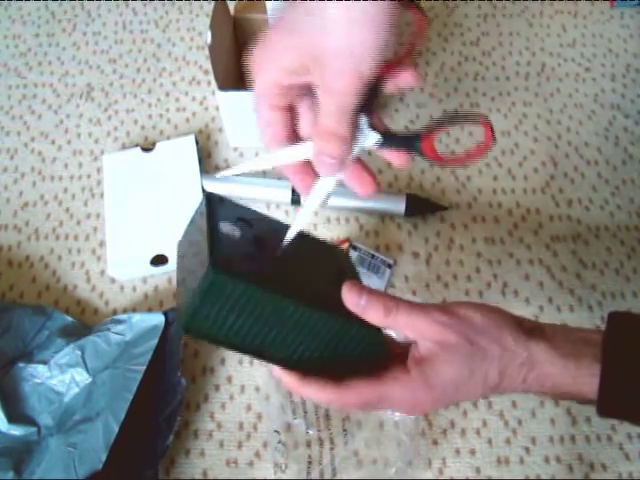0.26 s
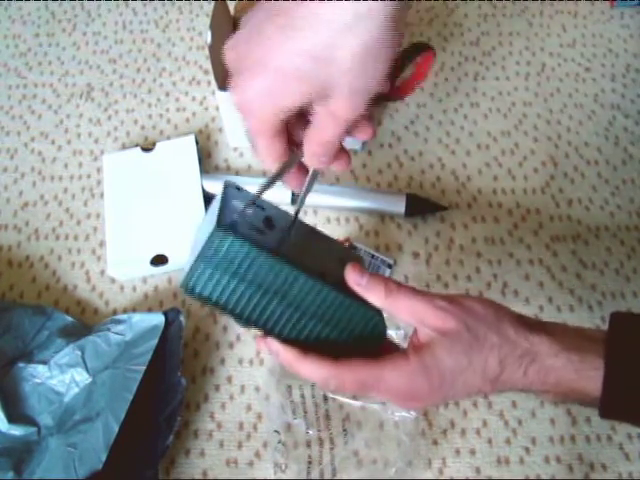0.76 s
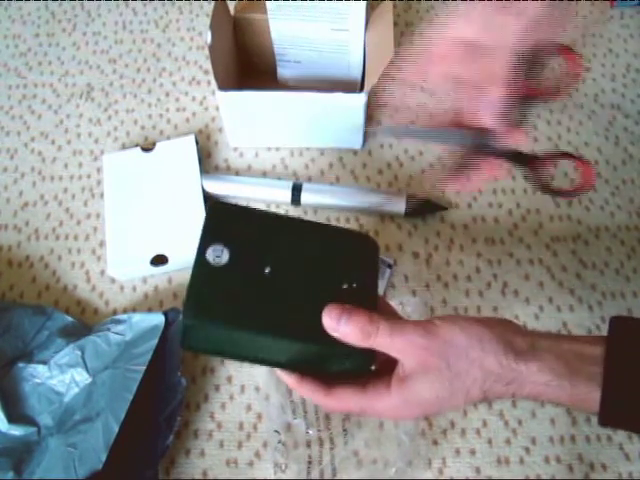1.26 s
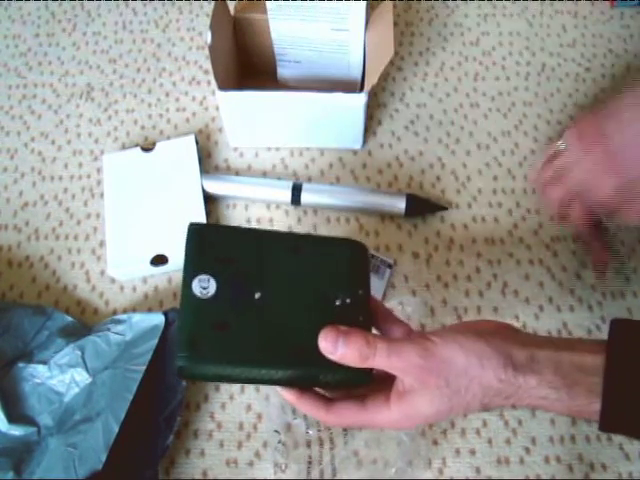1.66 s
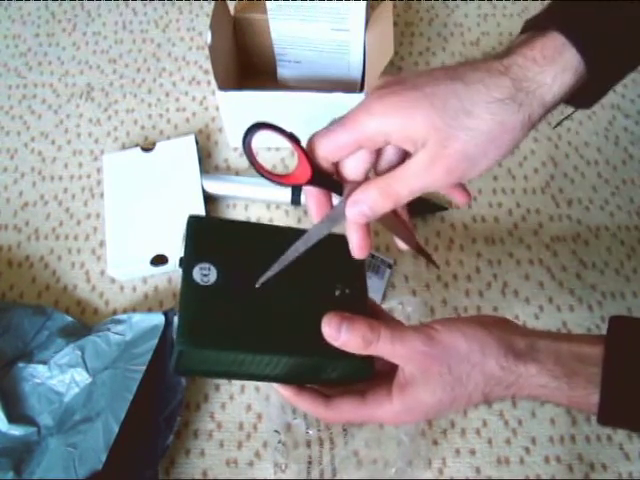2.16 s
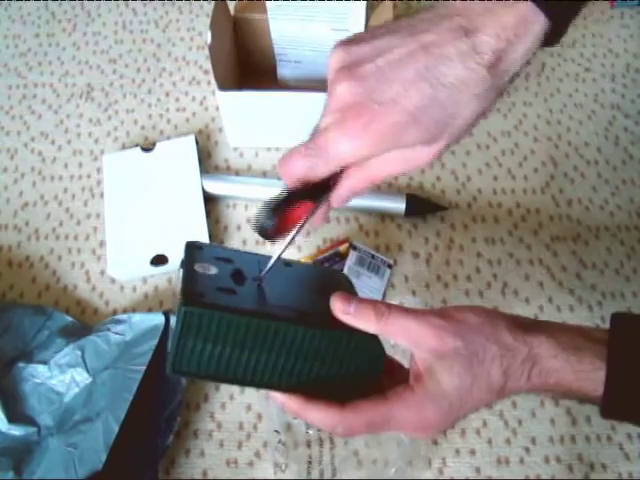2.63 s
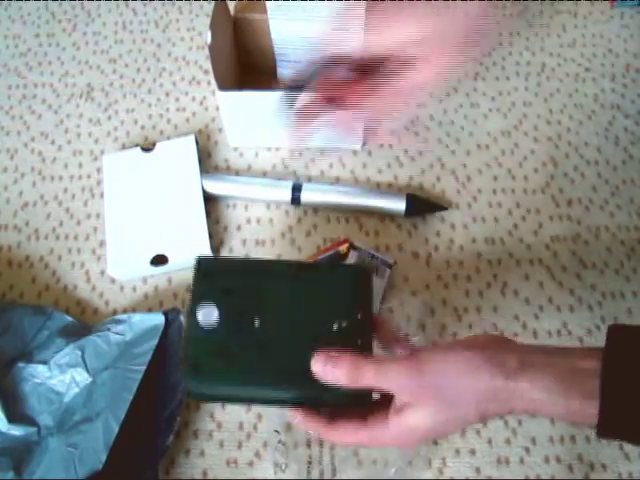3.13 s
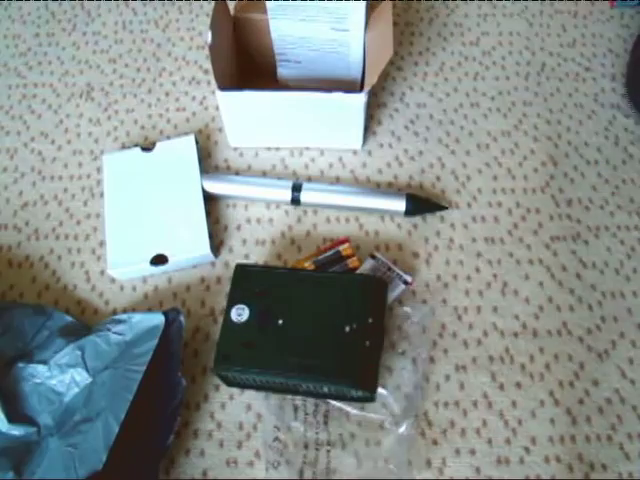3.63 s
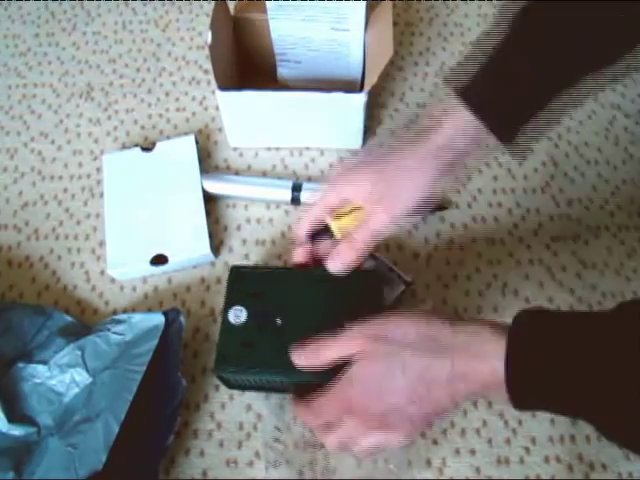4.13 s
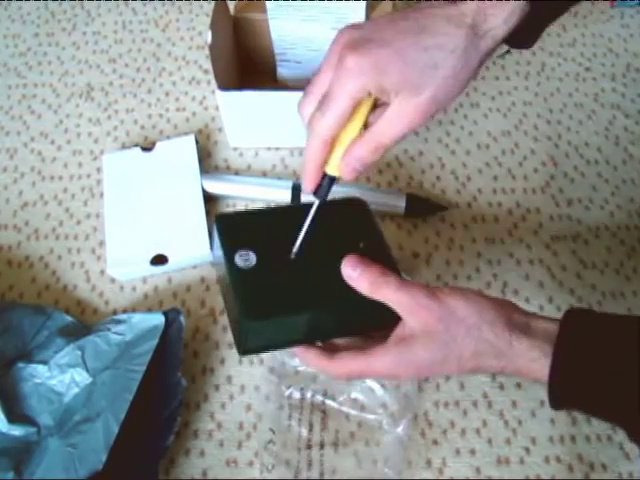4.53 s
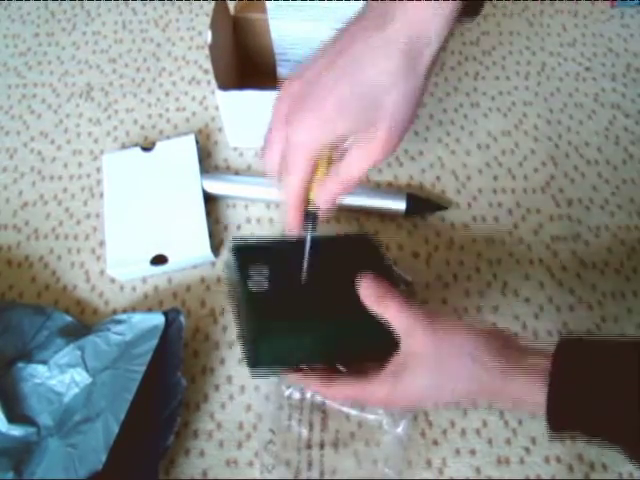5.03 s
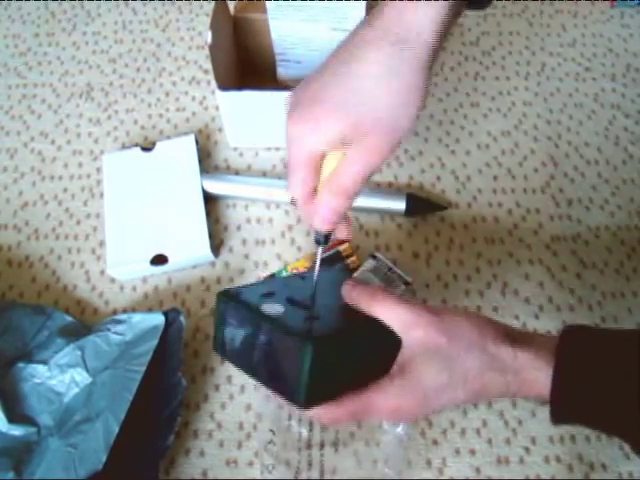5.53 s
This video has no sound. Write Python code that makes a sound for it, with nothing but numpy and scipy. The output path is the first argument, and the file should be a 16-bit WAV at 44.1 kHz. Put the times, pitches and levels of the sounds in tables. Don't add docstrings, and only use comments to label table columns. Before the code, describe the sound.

Scissor tips and then a small screwdriver knock sharply on a hollow plastic case, with soft finger bumps, bag crackle and faint fan whine.

```python
import sys
import numpy as np
from scipy import signal
from scipy.fft import rfft, irfft, next_fast_len
from scipy.io import wavfile
from scipy.ndimage import uniform_filter1d, map_coordinates

SR = 44100
rng = np.random.default_rng(int(sys.argv[2]) if len(sys.argv) > 2 else 0)


def ratio_of_db(decibels):
    return 10 ** (np.asarray(decibels, float) / 20)


def wav_record(signal):
    frames = np.transpose(np.atleast_2d(signal))
    bounded = np.clip(frames, -1, 1)
    quanta = np.round(bounded * 32767).astype(np.int16)
    wavfile.write(sys.argv[1], SR, quanta)


N = 255338
T = np.arange(SR // 4) / SR
ONSET_S = 0.0008


def unit(x):
    return x / np.sqrt(np.mean(x ** 2) + 1e-20)


def peak(x):
    return x / np.abs(x).max()


def along(points, hz):
    f, v = np.transpose(points)
    return np.interp(np.log(hz + 1), np.log(f + 1), v)


def curve(points):
    s, v = np.transpose(points)
    return np.interp(np.arange(N) / SR, s, v)


def wobble(rate_hz):
    knots = rng.standard_normal(int(N * rate_hz / SR) + 4)
    return map_coordinates(knots, [np.arange(N) * rate_hz / SR])


def filtered(x, response):
    m = next_fast_len(len(x) + 4096)
    return irfft(rfft(x, m) * response(np.fft.rfftfreq(m, 1 / SR)), m)[:len(x)]


def modes(peaks):
    def response(f):
        total = 0
        for k, (centre_hz, width_hz, db) in enumerate(peaks):
            damping = 1j * f * width_hz
            total = total + (-1) ** k * ratio_of_db(db) * damping / (centre_hz * centre_hz - f * f + damping)
        return (1j * f / (150 + 1j * f)) ** 2 * total
    return response


def add(track, s, sound, db):
    start = max(round(s * SR), 0)
    track[start:start + len(sound)] += ratio_of_db(db) * peak(sound)


def knocks():
    # (time [s], peak [dB], chatter [ms], edge crack [dB], room [dB])
    face = [(0.374, -14.5, 6.2, -5, -13), (0.377, -22, 1.3, -8, -25), (1.851, -21, 5.9, -3.5, -29),
            (1.869, -27.5, 0.93, -16, -18), (1.884, -26, 4.7, 3.5, -12), (3.2, -25, 3.9, 6, -15),
            (3.207, -22.5, 6.4, -10, -17.5), (3.215, -27.5, 2.1, 0, -4.5)]
    screw = [(0.866, -8.5, 2.85, -2, -8.5), (0.869, -28, 12, -5, -2), (2.607, -11, 5.2, -6.5, -12.5),
             (2.611, -26, 5.3, -10, -9), (4.907, -21.5, 1.5, -7, -38), (4.91, -9.5, 3.1, -6.5, -22.5)]
    rim = [(0.259, -30, 5, -8, -25), (0.266, -15, 1.8, -8, -11), (0.271, -21, 11, -0.5, -11)]
    lid = [(2.246, -24, 6.5, -15, -21), (2.253, -29, 2, -23, -11)]
    corner = [(0.059, -25, 2.6, -18, -31), (0.567, -36, 1.8, -24, -32), (0.575, -18.5, 2, -8.5, -16),
              (4.528, -19.5, 1.2, -1, -23), (4.533, -17, 1.4, -19, -28), (4.693, -33, 4.3, -2, -25)]
    # (frequency [Hz], width [Hz])
    shell_modes = [(400, 336), (545, 155), (720, 134), (900, 128), (1200, 340), (1550, 160), (1780, 290),
                   (2050, 147), (2350, 96), (3170, 153), (4150, 330), (5000, 350)]
    # (level [dB], ...)
    wakes_db = [
        [-29, -21, -22, -2, -13, -1, -14.5, -31, -6, -6.5, -19.5, -16],
        [-21.5, -26, -12.5, -7, -7, 1.5, -1.5, 0.5, -3, -2, -7, -9.5],
        [-16, -7, -11.5, -7.5, -12, 0, -6, -14, -7, -8.5, -17.5, -14.5],
        [-9, -2, -2.5, -1, -4.5, -4, -5, -7, -23, -9, -25, -35],
        [-37, -12.5, -30, -8, -12, -1, -2.5, -5, -8.5, -4, -12, -21],
    ]
    # (skid before blow [dB], jolt of whole case [dB])
    places = [
        (4.5, -64),
        (-2, -28.5),
        (4.5, -55),
        (2, -60),
        (-0.5, -60),
    ]
    shell_top_hz = 6050
    skid_s, jolt_s, front_s = 0.0017, 0.0009, 0.0014
    out, lead = np.zeros(N + SR), SR // 100
    t = T - lead / SR
    after = t >= 0
    for rows, wakes, (skid_db, jolt_db) in zip([face, screw, rim, lid, corner], wakes_db, places):
        ring = modes([(*mode, db) for mode, db in zip(shell_modes, wakes)])
        shell = lambda f: ring(f) / (1 + 1j * f / shell_top_hz) ** 4
        skid = ratio_of_db(skid_db) * np.exp(np.minimum(t, 0) / skid_s) * (t < 0)
        jolt = ratio_of_db(jolt_db) * np.exp(-(t / jolt_s - 1) ** 2)
        for s, db, ms, edge_db, room_db in rows:
            bounce = after * np.exp(-(t / max(ms, 0.3) * 700) ** 2)
            chatter = rng.standard_normal(len(T)) * (skid + bounce)
            chatter[lead] = 11
            crack = rng.standard_normal(len(T)) * (0.1 * skid + after * ratio_of_db(-60 * t / 0.02))
            crack = filtered(crack, lambda f: 1 / (1 + (4600 / (f + 1)) ** 4))
            hit = peak(filtered(chatter, shell)) + ratio_of_db(edge_db) * peak(crack)
            blow = hit * np.exp(-abs(t) / front_s)
            blow = blow * np.linalg.norm(hit) / np.linalg.norm(blow)
            echo = signal.fftconvolve(blow, tail())[:len(T)]
            add(out, s + ONSET_S - lead / SR, hit + jolt + ratio_of_db(room_db) * echo, db + 3.0)
    return out[:N]


def tail():
    # (frequency [Hz], t60 [s])
    room_t60 = [(300, 0.2), (1000, 0.19), (1500, 0.19), (3000, 0.2), (6000, 0.13), (10000, 0.18)]
    # (frequency [Hz], level [dB])
    room_colour = [(200, -2), (600, 1), (1400, 6.5), (2300, -8), (3200, -10), (6000, -11), (10000, -20.5)]
    hz, t, z = signal.stft(rng.standard_normal(len(T)), SR, nperseg=128)
    wall = 1 + 0.41 * np.exp(-((t - 0.038) / 0.011) ** 2)
    decay_db = along(room_colour, hz)[:, None] - 60 * t / along(room_t60, hz)[:, None]
    x = signal.istft(z * wall * ratio_of_db(decay_db), SR, nperseg=128)[1]
    x = x[:len(T)] * (1 - np.exp(-(T / 0.001) ** 2))
    return x / np.linalg.norm(x)


def taps():
    # (time [s], peak [dB])
    drumming = [(0.754, -27), (0.761, -40), (1.05, -30.5), (1.939, -35), (1.993, -24.5), (2.163, -33.5),
                (2.989, -28), (3.181, -37), (3.631, -36.5), (4.054, -33), (4.196, -31.5), (4.368, -26),
                (4.465, -36.5), (5.632, -36), (5.731, -27.5)]
    # (time [s], peak [dB], panel [Hz])
    rubs = [(0.104, -26.5, 1030), (0.698, -27, 1060), (1.165, -36, 606), (1.199, -29, 736),
            (0.754, -26, 1110), (1.506, -30, 660), (1.74, -31.5, 1240), (2.34, -29.5, 1090),
            (2.51, -31, 575), (2.809, -30.5, 1050), (3.106, -29, 1060), (4.097, -26, 1347),
            (4.124, -31, 685), (4.44, -31, 1250), (4.847, -36, 1240), (5.03, -28.5, 1340),
            (5.279, -43, 540)]
    # (time [s], peak [dB], panel [Hz])
    thuds = [(0.002, -35.5, 477), (0.015, -33, 494), (0.373, -26.5, 550), (0.752, -33.5, 415),
             (0.867, -30.5, 562), (1.405, -41, 610), (1.419, -34.5, 236), (1.43, -43, 456),
             (2.246, -31, 790), (2.247, -37, 453), (1.493, -40, 283), (2.611, -29, 553),
             (4.314, -42.5, 186)]
    # (frequency [Hz], level [dB])
    scuff_colour = [(300, -11.5), (900, -7), (1500, -6.5), (2300, -11.5), (4000, -17.5), (9000, -34)]
    contacts = [(*row, 899, 3.44, 1.5) for row in drumming]
    contacts += [(*row, 5.5, 11.5) for row in rubs]
    contacts += [(*row, 4.7, -11) for row in thuds]
    out = np.zeros(N + SR)
    for s, db, hz, ms, scuff_db in contacts:
        u = T[:4000] / (max(ms, 0.5) / 1000)
        press = rng.standard_normal((2, 4000)) * u * np.exp(-u)
        hum = filtered(filtered(press[0], modes([(hz, 55, 0)])), modes([(hz, 250, 0)]))
        scuff = filtered(press[1], lambda f: ratio_of_db(along(scuff_colour, f)))
        add(out, s - 0.003, peak(hum) + ratio_of_db(scuff_db) * peak(scuff), db - 6.5)
    return out[:N]


def ticks():
    # (time [s], peak [dB], centre [Hz], t60 [s])
    pivot = [(1.3173, -37.5, 3260, .012), (1.4142, -31.5, 9000, 0.022), (1.5618, -25.5, 9400, 0.023),
             (1.6155, -12, 10200, 0.014), (1.6158, -24.5, 1930, 0.011), (2.512, -39, 3770, 0.016),
             (2.9913, -27, 6350, 0.029), (3.501, -34.5, 5860, 0.014), (3.5668, -39.5, 6000, .008),
             (4.524, -35, 3170, .009), (5.0794, -42, 3150, .012), (5.1265, -37, 2870, .024),
             (5.4705, -31.5, 7200, 0.008)]
    # (time [s], peak [dB], centre [Hz])
    folds = [(3.162, -26, 9100), (3.1714, -40, 3600), (3.1834, -36, 4140), (3.2011, -23.5, 7100),
             (3.2084, -42, 2590), (3.2283, -28, 3850), (3.2408, -27, 2540), (3.2497, -29, 3810),
             (3.2624, -39, 4800), (3.276, -20.5, 7600), (3.2765, -22.5, 2500), (3.3099, -41, 4940),
             (3.3364, -42, 2850), (3.3837, -41, 3160), (4.0924, -34, 4410), (4.0992, -23, 5060),
             (4.1134, -27, 4430), (4.1335, -32, 5425), (4.1516, -30.5, 4400)]
    fold_t60_s, fold_body_db, pivot_body_db = 0.016, -22, -10
    snaps = [(*row, pivot_body_db) for row in pivot]
    snaps += [(*row, fold_t60_s, fold_body_db) for row in folds]
    out = np.zeros(N + SR)
    for s, db, hz, t60_s, body_db in snaps:
        fizz = rng.standard_normal(2000) * ratio_of_db(-60 * T[:2000] / max(t60_s, 0.002))
        fizz[0] = 5.5
        colour = modes([(2300, 1500, body_db), (hz, 0.57 * hz, 0)])
        add(out, s + ONSET_S, filtered(fizz, colour), db + 4.0)
    return out[:N]


def bag():
    # (time [s], hold [s], level [dB])
    crinkle = [(3.161, 0.016, -42.5), (3.21, 0.032, -42), (3.287, 0.049, -46.5), (4.09, 0.038, -45)]
    rise_db_per_s, fall_db_per_s = 1108, 394
    count, length = 20000, 64
    when = rng.integers(0, N - length, count)
    hz = np.clip(4800 * np.exp(0.6 * rng.standard_normal(count)), 900, 10500)[:, None]
    loud = ratio_of_db(3.1 * rng.exponential(size=count))[:, None]
    grain_t = T[:length]
    grain = loud * np.sin(2 * np.pi * hz * grain_t) * np.exp(-hz * grain_t / 4.9)
    film = np.bincount((when[:, None] + np.arange(length)).ravel(), grain.ravel(), N)
    rustle = filtered(rng.standard_normal(N), modes([(4500, 18000, 0)]))
    t = np.arange(N) / SR
    press = np.zeros(N)
    for s, hold_s, db in crinkle:
        rise_db = rise_db_per_s * np.maximum(s - t, 0)
        fall_db = fall_db_per_s * np.maximum(t - s - hold_s, 0)
        press += ratio_of_db(db - rise_db - fall_db)
    flicker = ratio_of_db(1.3 * wobble(120))
    crackle = filtered(unit(film) + 0.55 * unit(rustle), lambda f: f ** 2 / (f ** 2 + 700 ** 2))
    return press * flicker * unit(crackle)


def fan():
    # (frequency [Hz], density [dB per Hz])
    air_colour = [(24, -62), (40, -26.5), (156, -7.5), (215, -10.5), (272, -14.5), (522, -12.5), (662, -9),
                  (1150, -13), (1350, -9), (1740, -15), (1960, -9.5), (2340, -15.5), (4500, -20),
                  (5850, -77), (9900, -120)]
    # (frequency [Hz], density [dB per Hz])
    hiss_colour = [(2060, -2), (3500, -2.5), (3940, -1.5), (4400, -6), (5600, 2), (6060, 0.5), (7960, -0.5),
                   (9530, -5), (10000, -4.5), (13000, -53), (22000, -120)]
    # (time [s], level [dB])
    whine_level = [(0, -58.5), (1.3, -60.5), (2.2, -62), (2.55, -57), (3.05, -56), (3.35, -61.5),
                   (3.7, -60.5), (3.95, -56.5), (4.35, -57.5), (4.75, -62), (5.2, -54.5), (5.79, -65.5)]
    # (time [s], level [dB])
    creep = [(0, 0.5), (.85, 0.03), (1.47, 1), (1.8, 0.4), (3.3, 0.5), (4.05, 1.5), (4.8, 0.75), (5.15, 1),
             (5.79, 0.9)]
    gain_db = curve(creep)
    whine_db = curve(whine_level) + 4.5 + 1.5 * wobble(22)
    whine_hz = 1375 + 3.5 * wobble(14)
    whine = ratio_of_db(whine_db) * np.sin(2 * np.pi * np.cumsum(whine_hz) / SR)
    air_db = -52.5 + gain_db + 1.0 * wobble(30)
    hiss_db = -57 + 2.8 * gain_db + 1.6 * wobble(22.36)
    air = ratio_of_db(air_db) * rush(air_colour, patchy_db=1.1)
    hiss = ratio_of_db(hiss_db) * rush(hiss_colour, patchy_db=0.8)
    return air + hiss + whine


def rush(spectrum, patchy_db):
    z = signal.stft(rng.standard_normal(N), nperseg=256)[2]
    field = uniform_filter1d(rng.standard_normal(z.shape), size=14, axis=0)
    field = uniform_filter1d(field, size=4, axis=1)
    x = signal.istft(z * ratio_of_db(patchy_db * unit(field)), nperseg=256)[1][:N]
    return unit(filtered(x, lambda hz: ratio_of_db(along(spectrum, hz))))


def scene():
    return (knocks() + taps() + ticks() + bag() + fan())[None]


def low_pass(x):
    return signal.sosfilt(signal.butter(12, 10820, fs=SR, output="sos"), x)


def record(dry):
    # (time [s], length [s], lowest lost [Hz], loss [dB])
    dropouts = [(.363, .006, 1200, -18), (.568, .006, 4000, -22), (1.178, .008, 5200, -25),
                (1.55, .006, 5200, -20), (1.9, .012, 5600, -22), (2.597, .012, 4000, -9),
                (3.194, .008, 2500, -9), (3.271, .005, 6000, -18), (3.622, .006, 500, -12),
                (4.127, .008, 6500, -14), (4.143, .008, 7000, -12), (5.46, .008, 5600, -22)]
    top_hz = 10034
    hz, t, z = signal.stft(dry[0], SR, nperseg=128)
    for s, length_s, low_hz, loss_db in dropouts:
        z[np.ix_(hz > low_hz, abs(t - s) < length_s / 2)] *= ratio_of_db(loss_db)
    x = signal.istft(z, SR, nperseg=128)[1][:N]
    x = filtered(x, lambda f: f / (f + 45) / (1 + (f / top_hz) ** 160) + ratio_of_db(-67.0))
    mix = (x + ratio_of_db(-96) * rng.standard_normal(N))[None]
    return low_pass(mix)


dry = scene()
out = record(dry)
wav_record(out)
```